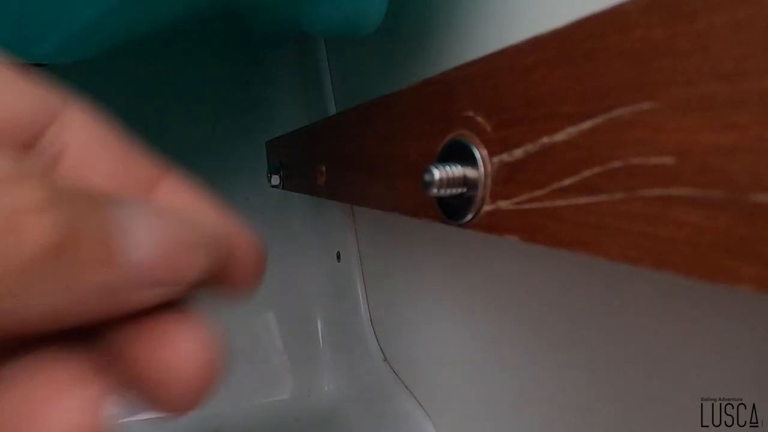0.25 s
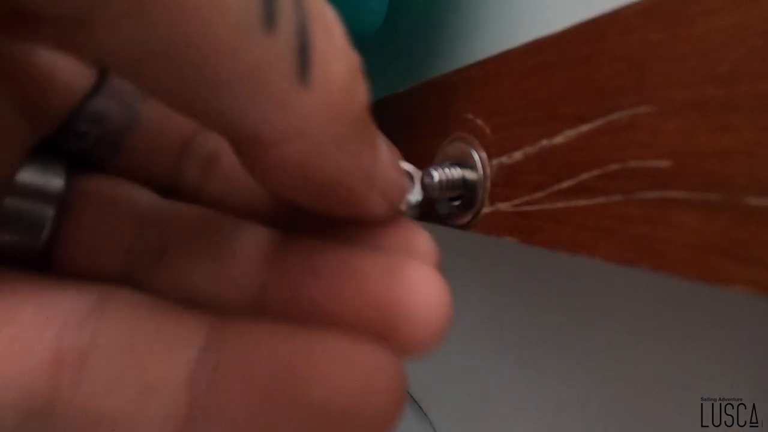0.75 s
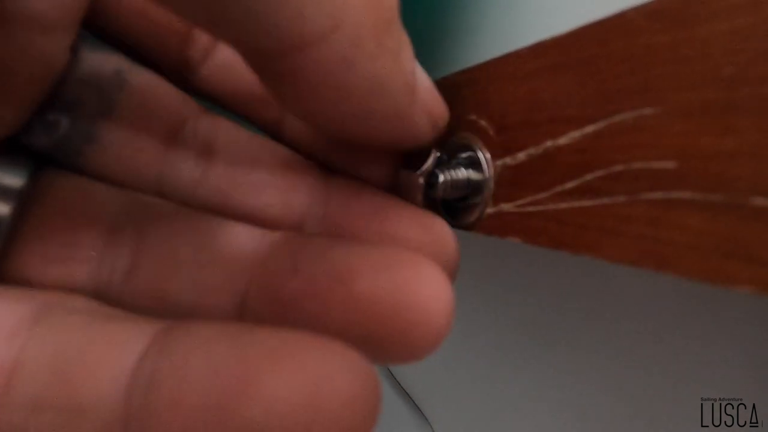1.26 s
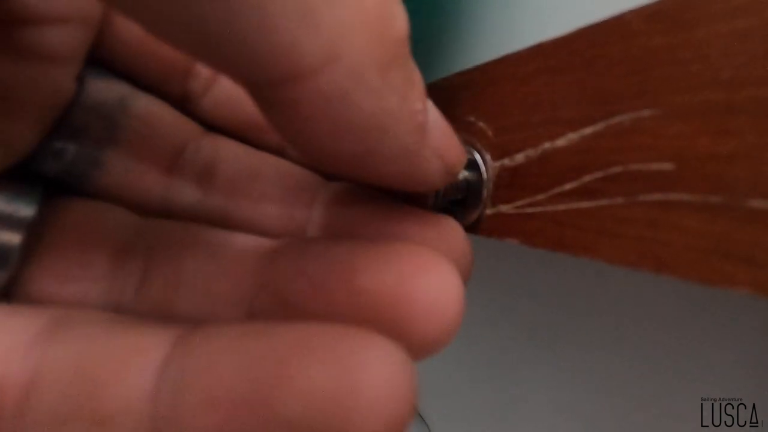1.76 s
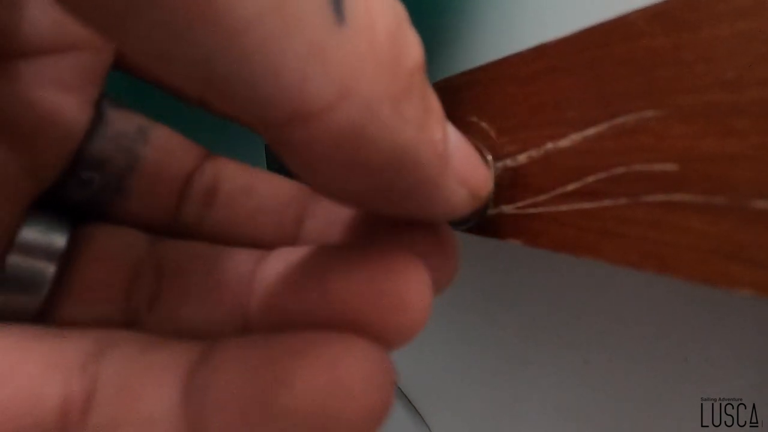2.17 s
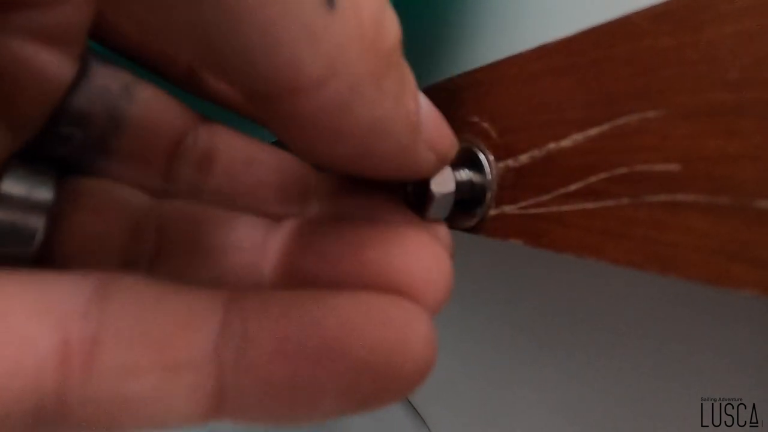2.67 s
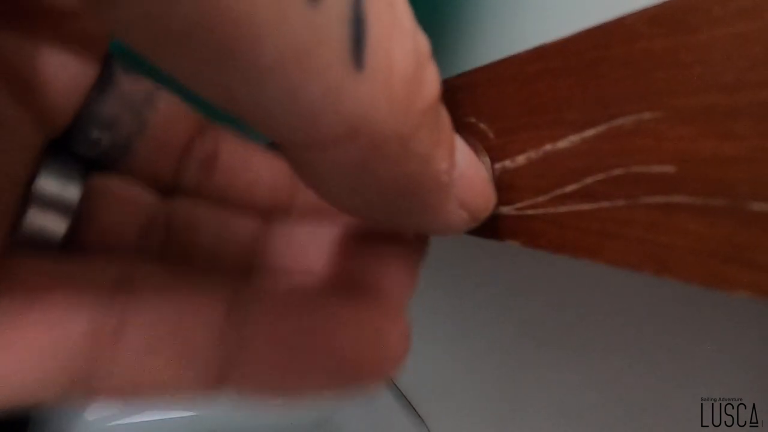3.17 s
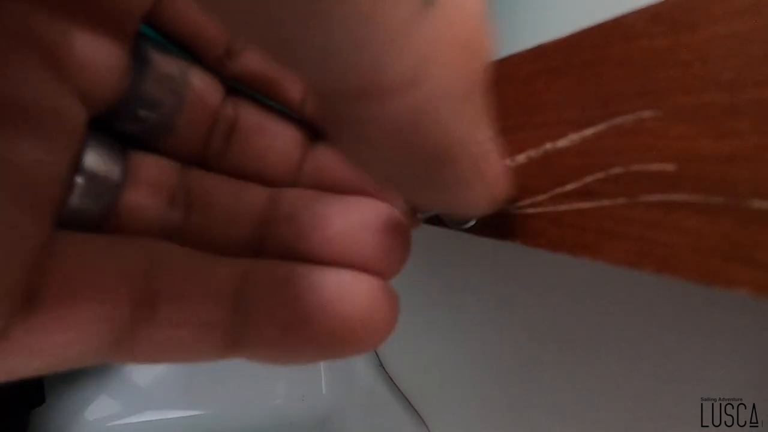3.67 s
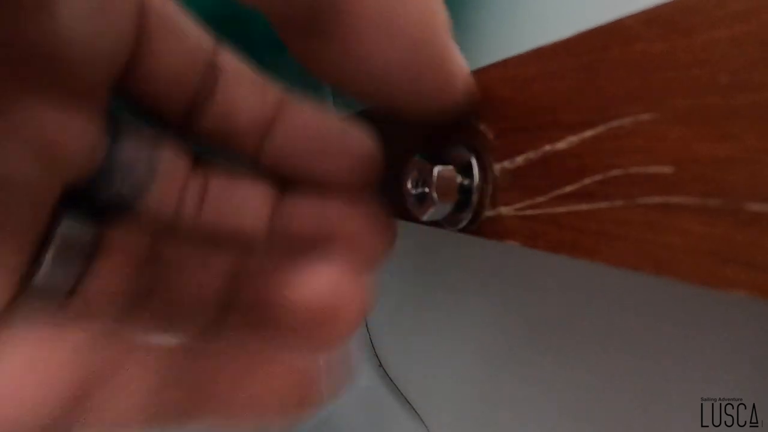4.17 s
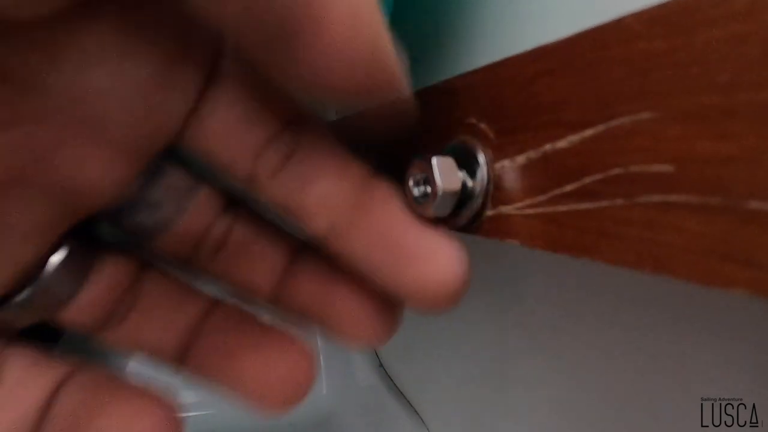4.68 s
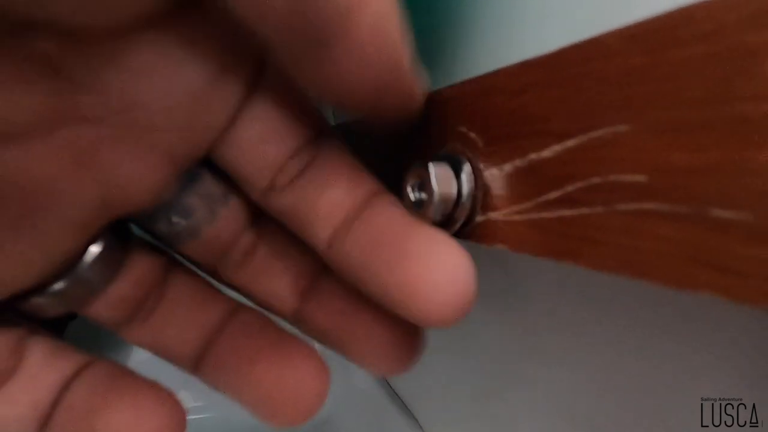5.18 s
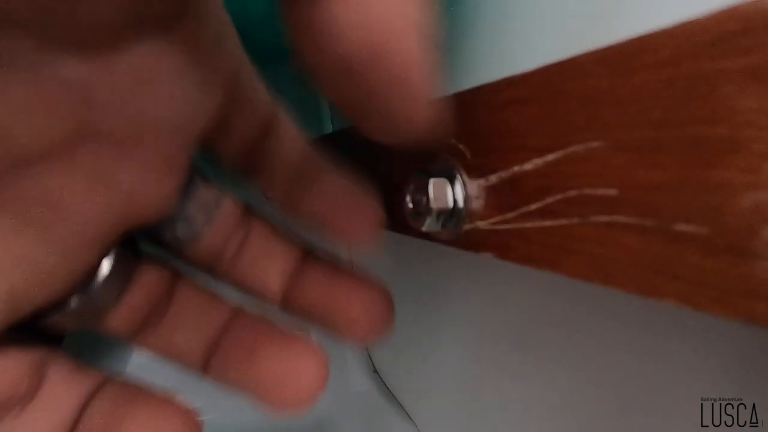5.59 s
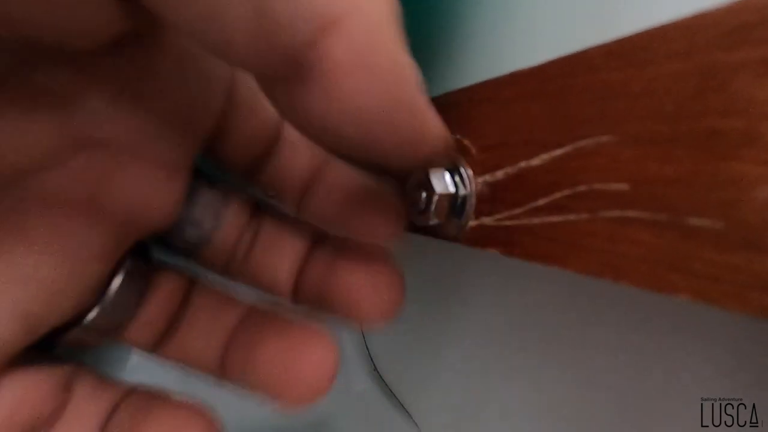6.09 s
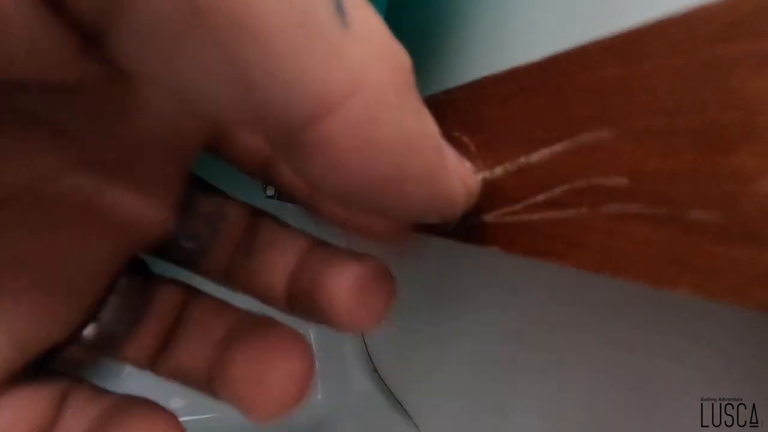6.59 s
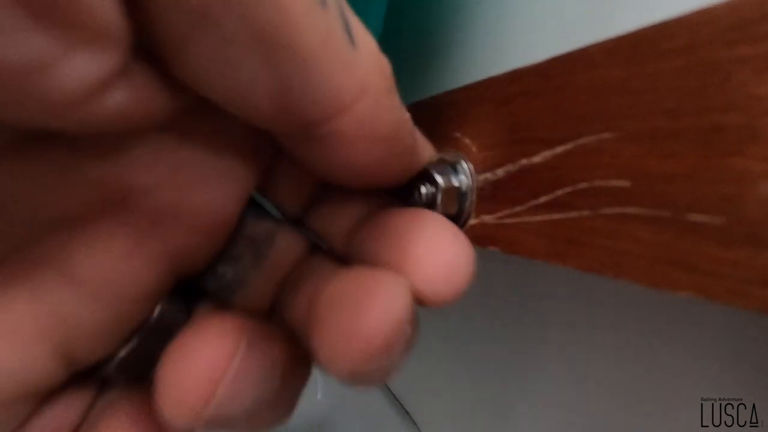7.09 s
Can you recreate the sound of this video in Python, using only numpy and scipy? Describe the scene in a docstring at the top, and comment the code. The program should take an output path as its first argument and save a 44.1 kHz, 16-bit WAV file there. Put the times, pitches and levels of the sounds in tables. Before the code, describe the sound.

Small steel nut and washer click, ring and scrape along a bolt in a wooden rail, growing louder, over a low engine drone.

```python
"""A washer and a nut are fitted and spun by hand onto a steel bolt through a wooden rail in a boat.
Short bursts wake the loose steel and the rail, so they click and ring; many tiny slips make threads
and fingers scrape, and soft blows are the hand knocking the rail against the hull.
Behind it an engine, built of sine tones over coloured noise, drones through the hull and on the
whole gathers speed, amid cabin air, brushing skin and soft buffets."""
import sys
import numpy as np
from scipy import signal
from scipy.fft import rfft, irfft, next_fast_len
from scipy.io import wavfile

SR = 44100
rng = np.random.default_rng(int(sys.argv[2]) if len(sys.argv) > 2 else 0)


def generate_wav(sig):
    """Save sig (samples, or channels by samples) to the path in sys.argv[1] as 16-bit PCM at SR."""
    pcm = np.round(np.clip(np.atleast_2d(sig).T, -1, 1) * 32767).astype(np.int16)
    wavfile.write(sys.argv[1], SR, pcm)


N = 323253
TIME = np.arange(N) / SR  # seconds

# Turns of the nut, thread sliding on thread.
# Each row: start in seconds, length in seconds, relative level in the rail in dB, steel above that in dB.
THREAD_TURNS = [(1.122, 0.067, -45.5, -5), (1.502, 0.092, -51.5, -6), (1.681, 0.095, -36, -10.5),
                (2.129, 0.1, -37.5, -13), (2.72, 0.49, -53.5, -11.5), (3.481, 0.29, -35, -16),
                (3.594, 0.06, -22, -11), (3.728, 0.19, -48.5, -10), (3.876, 0.24, -40, -20),
                (4.478, 0.086, -28.5, -5.5), (4.717, 0.1, -21, -4.5), (4.832, 0.069, -22, -9),
                (4.982, 0.12, -29, -0.5), (5.195, 0.054, -33.5, -7.5), (5.249, 0.063, -29.5, -3.5),
                (5.303, 0.064, -39.5, 0.5), (5.515, 0.072, -17, 1.5), (5.562, 0.076, -19, -7.5),
                (5.775, 0.12, -26.5, -6), (5.93, 0.28, -32.5, -7.5), (6.104, 0.036, -15, -0.5),
                (6.241, 0.12, -28, -10.5), (6.341, 0.068, -11, -13), (6.425, 0.044, -17, -9.5),
                (6.507, 0.094, -28.5, -8.5), (6.595, 0.075, -23.5, -6), (6.89, 0.043, -27.5, -10.5)]
# Tone colour of the bolt through the wooden rail. Each row: frequency in Hz, relative level in dB.
RAIL_COLOUR = [(60, -26), (220, 2), (300, -8), (560, -1), (780, -6), (1300, 0.5), (2000, -4), (2300, -14),
               (2900, -2.5), (3600, -15), (5000, -47), (8000, -33.5), (16000, -98.5)]
# Tone colour of the steel itself. Each row: frequency in Hz, relative level in dB.
STEEL_COLOUR = [(1500, -66.5), (3400, -7), (4100, 3.5), (4700, 3.5), (5400, -21.5), (7000, -19.5),
                (8500, -28), (9700, -23.5), (11000, -50), (16000, -53)]
# Tone colour of the steel's hard edges. Each row: frequency in Hz, relative level in dB.
EDGE_COLOUR = [(2000, -14.5), (4500, -8.5), (6000, 4.5), (7200, -1.5), (8400, -13.5), (11000, -17),
               (15500, -28.5)]
# Tone colour of the hull. Each row: frequency in Hz, relative level in dB.
HULL_COLOUR = [(25, 1), (70, -21.5), (140, -0.5), (206, 13), (290, -12), (390, -6.5), (600, -18),
               (800, -33), (1500, -20), (4000, -36.5), (12000, -106.5)]
# Ringing notes of the rail. Each row: frequency in Hz, width in Hz, relative strength in dB.
RAIL_RINGS = [(215.6, 15, 4), (377, 16.3, 11.5), (577, 39, 11.5), (1016, 15, 5.5), (1163, 7, 5.5),
              (1388, 23, 2.5), (1910, 50, 4.5), (2444, 41, 5), (2580, 150, 10), (3084, 82, 4.5)]
# Ringing notes of the washer and nut. Each row: frequency in Hz, width in Hz, relative strength in dB.
STEEL_RINGS = [(4060, 50, 5), (4230, 55, 12), (4500, 80, 8), (5930, 70, 7), (6790, 70, 4), (9690, 70, 16.5)]
# Tone colour of the low rumble in the hull. Each row: frequency in Hz, relative level in dB.
RUMBLE_COLOUR = [(15, -22), (35, -17.5), (55, -6), (75, 4.5), (110, -3.5), (160, -6.5), (210, -2.5),
                 (240, -15.5), (280, -28.5), (500, -28), (1200, -77), (5000, -100)]


def amp(db):
    """Turns decibels into a gain."""
    return 10 ** (np.asarray(db) / 20)


def unit(x):
    """Scales a sound to an rms level of 1."""
    return x / np.sqrt(np.mean(x ** 2) + 1e-20)


def read(points, hz):
    """Reads a curve of (Hz, value) points along a logarithmic frequency axis."""
    f, value = np.transpose(points)
    return np.interp(np.log(hz + 1), np.log(f + 1), value)


def follow(rows):
    """Reads the columns of a curve over time at every sample."""
    s, *columns = np.transpose(rows)
    return [np.interp(TIME, s, c) for c in columns]


def add(mix, s, sound):
    """Mixes a stereo sound in at s seconds."""
    part = mix[:, max(round(s * SR), 0):][:, :sound.shape[1]]
    part += sound[:, :part.shape[1]]


def drift(rate_hz):
    """Wanders at random with an rms of 1, heading for a new value rate_hz times a second."""
    knots = rng.standard_normal(400)
    return unit(np.interp(TIME * rate_hz, np.arange(len(knots)), knots))


def colour(x, spectrum, modes=(), pitch=1, uneven_db=0, tilt=0):
    """Passes two drives through a ringing body, then blends them into a partly alike stereo pair."""
    # Likeness of the two channels. Each row: frequency in Hz, likeness from 0 to 1.
    likeness = [(100, .985), (600, .96), (1400, .88), (2500, .62), (5000, .6), (8000, .05)]
    # Balance of the two channels. Each row: frequency in Hz, left minus right in dB.
    balance = [(100, 2.8), (200, 1), (380, -.5), (700, .5), (1300, 2), (4400, 2.7), (8000, 1), (12000, -2)]
    size = 2 * next_fast_len(x.shape[1] // 2 + 2048)
    hz = np.fft.rfftfreq(size, 1 / SR)
    tuned = hz / np.interp(hz, [5000, 5800], [pitch, 1])  # only the lower part shifts in pitch
    power = np.ones(len(hz))
    for f, width, db in modes:
        strength = amp(db + uneven_db * np.clip(rng.standard_normal(), -2, 1))
        power += strength ** 2 / (1 + (2 * (tuned - f) / width) ** 2)
    slope = tilt * np.log2(np.clip(hz, 500, 3200))  # tilt in dB per octave favours the upper modes
    gain = amp(read(spectrum, tuned) + slope) * np.sqrt(power)

    # Folding the cepstrum gives a filter that rings only after its drive, never before
    cepstrum = irfft(np.log(gain))
    cepstrum[1:size // 2] *= 2
    cepstrum[size // 2 + 1:] = 0
    body = np.exp(rfft(cepstrum))

    a, b = rfft(x, size)
    same = np.clip(read(likeness, hz), -1, 1)
    lean = amp(read(balance, hz) / 2)
    left = a * lean
    right = (same * a + np.sqrt(1 - same ** 2) * b) / lean
    return irfft(np.array([left, right]) * body)[:, :x.shape[1]]


def blow(rise, contact, tail_db, t60, size=9000):
    """A short chatter of contact, then dense cabin reflections; rise, contact and t60 are in seconds."""
    t = np.arange(size) / SR
    fall = np.exp(-t / contact) + amp(tail_db - 60 * t / t60)
    shape = (1 - np.exp(-t / rise)) * fall
    return shape * rng.choice([-1., 1.], (2, size))


def struck(sound, db, size):
    """Sets the rms level of the first samples of a hit."""
    return sound * amp(db) / np.sqrt(np.mean(sound[:, :size] ** 2) + 1e-20)


def strokes(rows):
    """Gain over time of hand strokes (start s, length s, dB) that swell, then fade."""
    swell_share = .45  # of the stroke's length
    shapes = []
    for start, length, db in rows:
        progress = (TIME - start) / length
        shapes.append(amp(db) * np.interp(progress, [0, swell_share, 1], [0, 1, 0]))
    return np.linalg.norm(shapes, axis=0)


def grit(slips_per_s, spread_db, spots_per_s=22, count=9):
    """Tiny slips of very unequal size; the contact wanders over spots with their own reflections."""
    happens = rng.random(N) < slips_per_s / SR
    strength = amp(spread_db * np.minimum(rng.exponential(1, N), 3))
    slips = happens * strength * rng.choice([-1., 1.], N)
    spot = (TIME * spots_per_s + 2 * rng.random(N)).astype(int) % count
    total = np.zeros((2, N))
    for k in range(count):
        here = (slips * (spot == k))[None]
        total += signal.oaconvolve(here, blow(.0001, 0.0029, -2.0, 0.066), axes=1)[:, :N]
    return total


def clicks(graze_db=-22, graze_s=.011, clean_db_per_hardness=1.5, rebound_db=-13, rebound_s=0.011):
    """Washer and nut graze the bolt, strike it, and rebound once; a hard touch lands cleanly."""
    # Steel touching steel. Each row: time in seconds, relative level in the rail in dB, ring of the nut
    # above that in dB, hard tick above that level in the rail in dB, hardness as a tilt in dB per octave.
    hits = [ (0.8445, -28, -7, -5, -0.5), (1.0214, -32.5, 7.5, -9, 1), (1.203, -34, -6.5, -9, -2.5),
            (1.2977, -33, 3.5, -4.5, -4), (1.425, -42, -7, -7, 2.5), (1.4935, -39, -10.5, -22, -2),
            (1.7005, -28.5, -14, -6.5, 1.5), (2.0412, -37, -7.5, -16, -0.5),
            (2.1737, -31.5, -6.5, -20, -0.5), (2.229, -26, -21, -15.5, -3), (2.66, -41.5, -12, -19, -7),
            (2.7495, -24.5, -8, -13, 3), (3.058, -43.5, 0.5, -7, 6), (3.238, -21.5, -12, -13, 5.5),
            (3.3716, -34.5, -7.5, -8.5, 3.5), (3.5284, -30, -14.5, -16, -2),
            (3.637, -26.5, -20, -8.5, -3.5), (3.664, -37, -29, -30, -15), (3.781, -40.5, -2.5, -9, 4),
            (3.837, -42.5, 2.5, -13, 3), (3.917, -32.5, -7, -12, -2), (3.928, -27.5, -6, -16, 8),
            (4.028, -23.5, -2.5, -11.5, 4.5), (4.1541, -34.5, -4.5, -10, 5.5),
            (4.4107, -29.5, -7.5, -16, -1), (4.495, -30, 1.5, -1.5, -2), (4.6482, -38, 0, 0, 4),
            (4.7266, -30.5, 1, -10, 6), (4.7588, -17, -11, -13, -2), (4.8026, -29, 1, -2.5, 6),
            (4.8314, -17.5, 5, -11.5, 4.5), (4.8471, -20.5, 7.5, -16, 4), (4.8589, -19.5, 6, -14, 1.5),
            (4.8903, -19.5, 8.5, -12, 2.5), (4.924, -16.5, 5, -16, 2.5), (4.9615, -16.5, 7, -22, 0),
            (5.0252, -15.5, -28, -15, -1.5), (5.0409, -23, -1, -1.5, 10), (5.2085, -25, -4, -18, -1.5),
            (5.318, -21, -8.5, -15, 6.5), (5.4708, -26, 3.5, -14.5, 0), (5.522, -17, -2, -4, 7),
            (5.5656, -20.5, -9, 1.5, 0), (5.5794, -19.5, 8, -10, 2), (5.605, -16.5, 5.5, -8, 3),
            (5.663, -27, 0.5, -13, 2), (5.7689, -24, -6, -15.5, -3.5), (5.8333, -24, 0, 4.5, 3.5),
            (6.0392, -17.5, 0.5, -2.5, 0.5), (6.2684, -26.5, 1, -11, -0.5), (6.3533, -12.5, -3.5, -9.5, -1),
            (6.4017, -9, -40, -11.5, -2), (6.4108, -19.5, 9.5, -17, 0), (6.4415, -20, 5.5, -16, -2.5),
            (6.4916, -27.5, 1, -18, -1), (6.6397, -19, 1.5, -6, -3), (6.8014, -33.5, -4, 3.5, 0.5)]
    out = np.zeros((2, N))
    gaps = rng.uniform(.5, 1.5, len(hits))  # stretch the times between graze, strike and rebound
    for (s, db, ring, tick, hardness), gap in zip(hits, gaps):
        hit = touch(s, db, ring, tick, hardness)
        light = touch(s, db, ring, tick, hardness)
        light_db = graze_db - clean_db_per_hardness * max(hardness, 0)
        add(out, s - graze_s * gap, amp(light_db) * light)
        add(out, s, hit)
        add(out, s + rebound_s * gap, amp(rebound_db) * light)
    return out


def touch(s, db, ring, tick, hardness, rail_db=-0.5, ring_db=0.0, tick_db=2, detune=0.01):
    """One touch ticks, rings the nut and passes down the bolt into the rail; each differs by chance."""
    # The lower steel notes drop while the nut spins free. Each row: time in seconds, factor on their
    # pitch (a small random detuning comes on top).
    seating = [(4.6, 1.04), (4.82, 1), (5, 1), (6.4, 1.035)]
    pitch = np.interp(s, *np.transpose(seating)) * (1 + detune * rng.standard_normal())

    # Fingers that damp the ring damp its top note most
    free_ring_db, top_damping = 3.5, 0.58  # ring of a free nut; dB lost per dB below that
    *lower, (top_hz, top_width, top_db) = STEEL_RINGS
    damped_db = top_db - top_damping * max(free_ring_db - ring, 0)
    modes = lower + [(top_hz, top_width, damped_db)]

    push = blow(0.00059, 0.0063, -15.5, 0.16)
    wood = colour(push, RAIL_COLOUR, RAIL_RINGS, uneven_db=2.5, tilt=hardness)
    steel = colour(blow(0.00035, .0019, -21, 0.11), STEEL_COLOUR, modes, pitch, uneven_db=8)
    soft_db = 0.82 * min(db + tick + 26, 0)  # a light touch has less of the highest treble
    snap = blow(.0005, .002, -13, .065)
    edge = colour(snap, [(hz, level + soft_db * (hz > 8000)) for hz, level in EDGE_COLOUR])
    parts = (wood, rail_db), (steel, ring + ring_db), (edge, tick + tick_db)
    return sum(struck(sound, db + part_db, size=440) for sound, part_db in parts)


def catches(spread_db=4, loudest_db=-33, ring_db=-8, tick_db=-11, hardest=4, count=130):
    """Now and then the threads catch under moving fingers: light touches that follow the stroke."""
    out = np.zeros((2, N))
    effort = strokes([row[:3] for row in THREAD_TURNS])
    for k, (when, level, ring, tick, hard) in enumerate(rng.uniform(-1, 1, (count, 5))):
        at = int((k + .5 + when / 2) * (N - 1) / count)
        if effort[at] > 0:
            # The limit holds before the random spread
            db = min(20 * np.log10(effort[at]), loudest_db) + spread_db * level
            nut_db = ring_db + 2 * spread_db * ring
            hard_db = tick_db + 2 * spread_db * tick
            add(out, at / SR, touch(at / SR, db, nut_db, hard_db, hardest * hard))
    return out


def scrapes(ring_db=-2, tick_db=-3, hull_db=-8):
    """Hard slips of thread on thread sound in the steel, the rail and the hull."""
    in_rail = strokes([(start, length, db) for start, length, db, steel in THREAD_TURNS])
    in_steel = strokes([(start, length, db + steel) for start, length, db, steel in THREAD_TURNS])
    slips = grit(450, 6)
    wood = unit(colour(slips, RAIL_COLOUR, RAIL_RINGS))
    wood = wood + amp(hull_db) * unit(colour(slips, HULL_COLOUR, RAIL_RINGS))
    # Gripping fingers damp the top note of the steel, so it is left out
    metal = amp(ring_db) * unit(colour(slips, STEEL_COLOUR, STEEL_RINGS[:-1], 1.015))
    metal = metal + amp(tick_db) * unit(colour(slips, EDGE_COLOUR))
    return in_rail * wood + in_steel * metal


def rubs():
    """Skin sticks and slips, dully, on the nut and wood."""
    # Soft fingers rubbing. Each row: start in seconds, length in seconds, relative level in dB.
    finger_strokes = [(.12, 0.19, -39.5), (1.1, 0.29, -40.5), (1.7, 0.098, -35), (1.87, 0.12, -33),
                      (2.18, 0.052, -28.5), (2.24, 0.15, -37.5), (4.756, 0.031, -13.5),
                      (5.015, 0.019, -9.5), (5.03, 0.44, -35.5), (6.55, 0.58, -38), (6.86, 0.085, -20.5),
                      (7.05, 0.1, -29), (7.15, 0.047, -25), (7.22, .13, -28.5)]
    # Tone colour of a rubbing fingertip. Each row: frequency in Hz, relative level in dB.
    finger_colour = [(80, -24), (220, 0), (300, 1.5), (620, 0), (850, -4.5), (1150, -0.5), (1700, -2),
                     (2300, -21.5), (4500, -17.5), (7000, -25.5), (14000, -59)]
    return strokes(finger_strokes) * unit(colour(grit(300, 5.6), finger_colour, RAIL_RINGS))


def knocks(level_db=-5.0):
    """Soft blows of the hand wake the low modes of the rail and hull."""
    # The hand bumping the bolt and rail. Each row: time in seconds, relative level in dB.
    bumps = [(0.846, -32), (1.825, -27.5), (2.19, -34.5), (3.623, -34), (4.766, -13), (5.026, -22),
             (5.273, -25), (5.524, -15), (5.799, -18), (5.965, -16), (6.04, -18), (6.355, -28),
             (6.402, -10), (6.44, -19.5), (6.497, -19), (6.638, -15), (6.805, -20.5), (6.895, -28),
             (7.078, -17), (7.274, -23)]
    out = np.zeros((2, N))
    for s, db in bumps:
        push = blow(.0012, .011, -12, .15)
        sound = colour(push, HULL_COLOUR, RAIL_RINGS, uneven_db=1.5)
        add(out, s, struck(sound, db + level_db, size=1800))
    return out


def cabin(x, wet_db=-12):
    """The small hard cabin lets each stroke linger, as a burst of dense fading echoes."""
    echoes = blow(0.0035, 0.0074, -9.5, 0.23)
    echoes = echoes / np.linalg.norm(echoes[0])
    return x + amp(wet_db) * signal.oaconvolve(x, echoes, axes=1)[:, :N]


def engine(orders_db=-2, rumble_db=-4, fade_db=3, wobble=0.0098):
    """Low multiples of the engine's cycle pass the hull; the upper ones fade in and out over rumble."""
    # Engine speed before a slight wobble. Each row: time in seconds, cycles a second.
    speed_curve = [(0, 9.74), (1.5, 10.33), (3, 11.25), (4, 11.7), (5, 12.4), (6, 11.92), (7.33, 14.2)]
    # Loudness of the upper tones and rumble. Each row: time in seconds, relative level in dB.
    loudness_curve = [(0, -37), (.9, -35.5), (1.9, -31), (4.4, -27.5), (6.3, -31), (7.33, -32.5)]
    # Tones other than the firing note. Each row: multiple of the cycle rate, relative level in dB.
    upper_orders = [(8, -6.5), (9, 1), (10, -16.5), (11, -5.5), (12, 1), (13, 2), (14, -12), (16, -5.5),
                    (18, -7)]
    firing = 6  # firing note as a multiple of the cycle rate
    # The hull booms when the firing note reaches its resonance
    boom_hz, boom_width_hz, boom_db = 73.27, 2.77, -24

    speed, = follow(speed_curve)
    upper_db, = follow(loudness_curve)
    boom = amp(boom_db) / np.hypot(1, 2 * (firing * speed - boom_hz) / boom_width_hz)
    turn = 2 * np.pi * (np.cumsum(speed) / SR + wobble * drift(6))  # phase of the cycle in radians
    upper = np.zeros(N)
    for k, db in upper_orders:
        level = amp(db + fade_db * drift(2.57))
        upper += level * np.sin(round(k) * turn + 2 * np.pi * rng.random())
    tones = boom * np.sin(firing * turn) + amp(upper_db + orders_db) * unit(upper)
    noise = rng.standard_normal((2, N))
    rumble = amp(upper_db + rumble_db) * unit(colour(noise, RUMBLE_COLOUR))
    return tones * amp([[1.2], [-1.2]]) + rumble  # tones lean left, in dB


def ambience(air_db=-57, swing_db=-2, deep_db=-56, deep_db_per_s=2.44):
    """Coloured noise: cabin air, brushing skin, a slowly growing deep rumble and the swinging hand."""
    # Tone colour of the still air in the cabin. Each row: frequency in Hz, relative level in dB.
    air_colour = [(200, -1), (600, -6), (1300, -7), (2000, -13), (3500, -19.5), (7200, -18), (8800, -31),
                  (10000, -65), (16000, -43)]
    # Skin brushing as the hand reaches in and regrips.
    # Each row: start in seconds, length in seconds, relative level in dB.
    skin_strokes = [(.04, .12, -50.5), (.12, 0.27, -56), (.47, 0.3, -55.5), (7.02, 0.22, -49)]
    # Air buffeting the microphones as the hand swings.
    # Each row: start in seconds, length in seconds, relative level in dB.
    hand_swings = [(.1, 0.38, -30.5), (5.1, .8, -36), (6.29, .28, -25)]
    skin_colour = [(500, -24), (2500, 1), (6500, 12.5), (7800, 9.5), (9000, -2), (15500, -14)]
    deep_colour = [(8, -18.0), (22, -4.5), (34, 0), (50, -3.5), (80, -5.5), (200, -55.0), (800, -100)]

    air, skin, deep, flutter = rng.standard_normal((4, 2, N))
    still = amp(air_db) * unit(colour(air, air_colour))
    brush = strokes(skin_strokes) * amp(2 * drift(46.2))  # the level flickers
    skin = unit(colour(skin, skin_colour))
    deep = unit(colour(deep, deep_colour))
    flutter = unit(colour(flutter, RUMBLE_COLOUR))
    buffet = strokes(hand_swings) * (amp(swing_db) * deep + flutter)
    growing = amp(deep_db + deep_db_per_s * TIME) * deep
    return still + brush * skin + growing + buffet


def scene():
    """The work at the bolt over the drone; sound reaches the left microphone slightly later."""
    left_lag = 2  # samples
    work = clicks() + catches() + knocks() + cabin(scrapes() + rubs())
    left, right = work + engine() + ambience()
    return np.array([np.pad(left, (left_lag, 0))[:N], right])


def record(dry):
    """Rounds off the loudest hits near full scale, then removes the highest treble."""
    edge_hz = 15850
    limited = dry / (1 + dry ** 6) ** (1 / 6)
    lowpass = signal.firwin(511, edge_hz, window=("kaiser", 9), fs=SR)
    return signal.oaconvolve(limited, lowpass[None], "same")


dry = scene()
out = record(dry)
generate_wav(out)
```